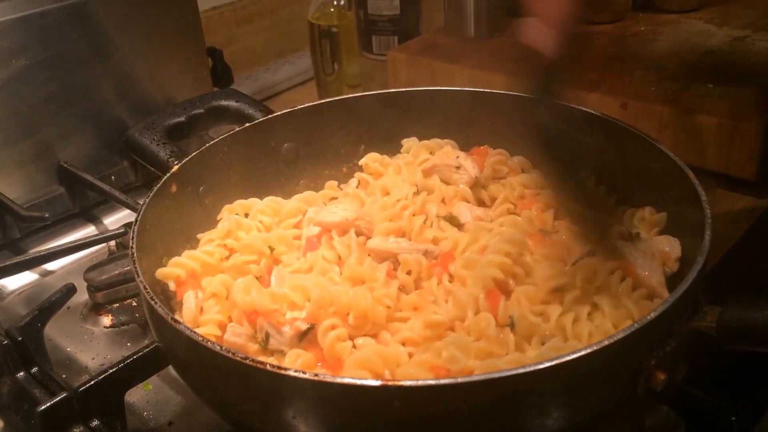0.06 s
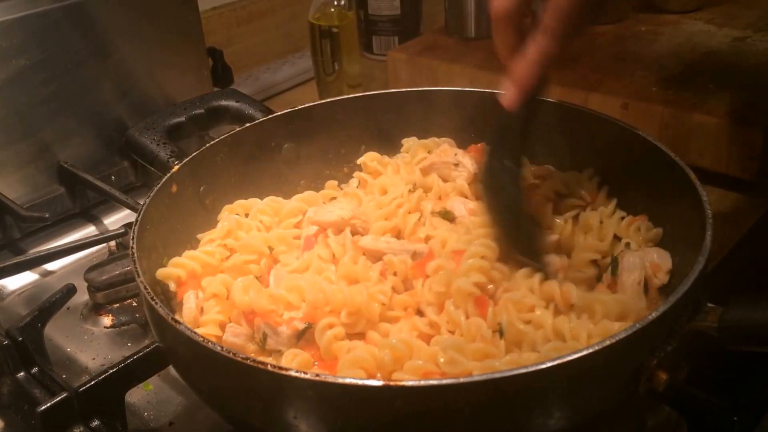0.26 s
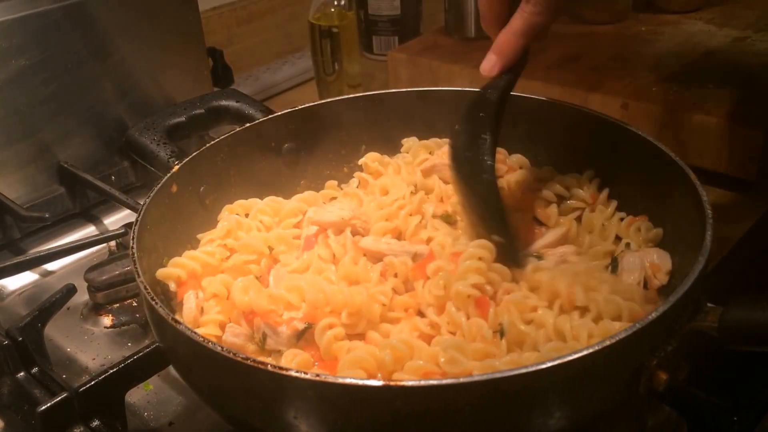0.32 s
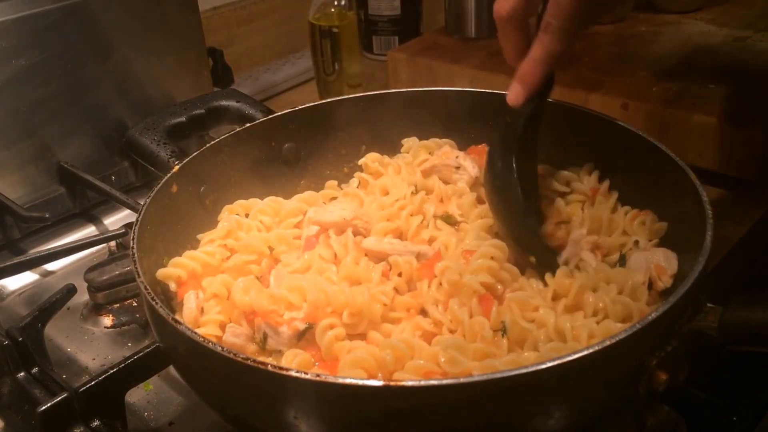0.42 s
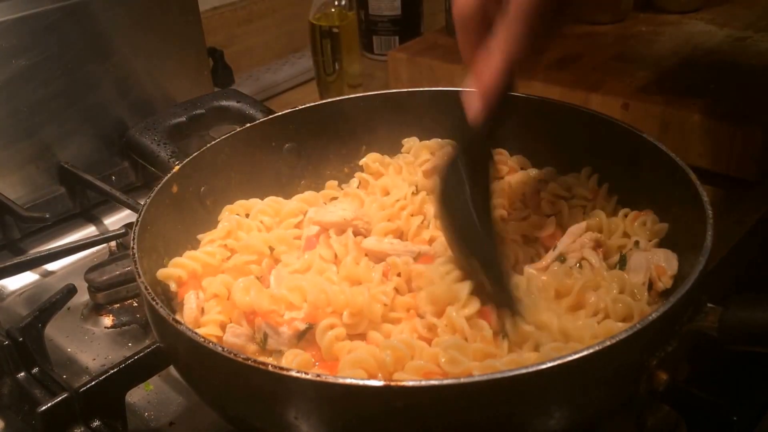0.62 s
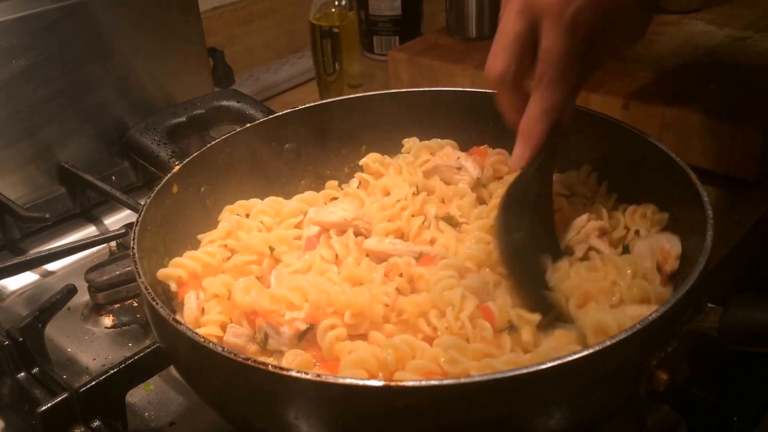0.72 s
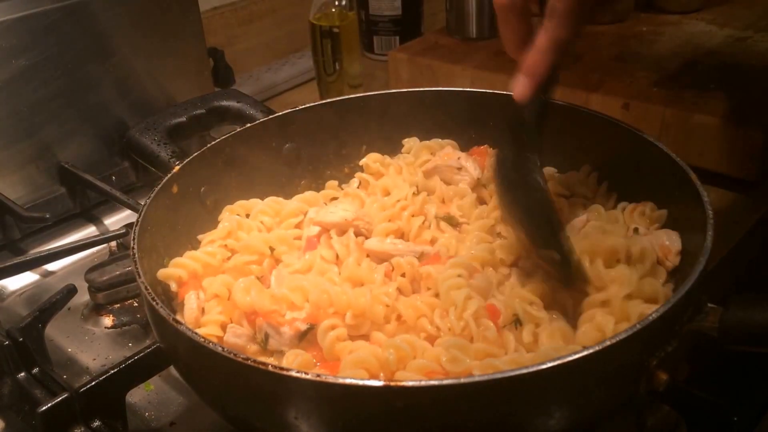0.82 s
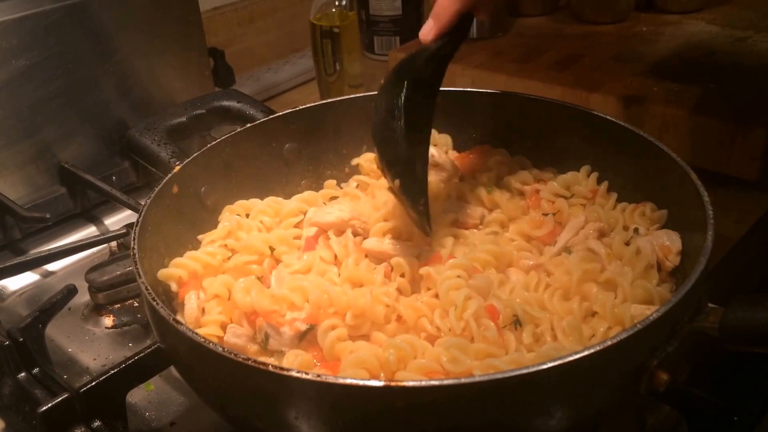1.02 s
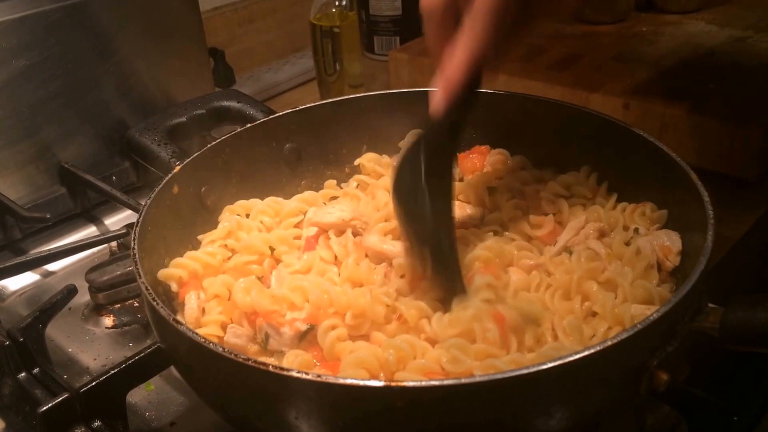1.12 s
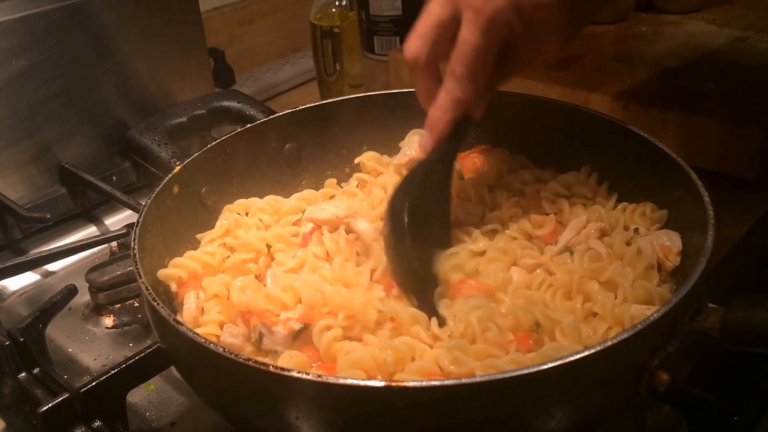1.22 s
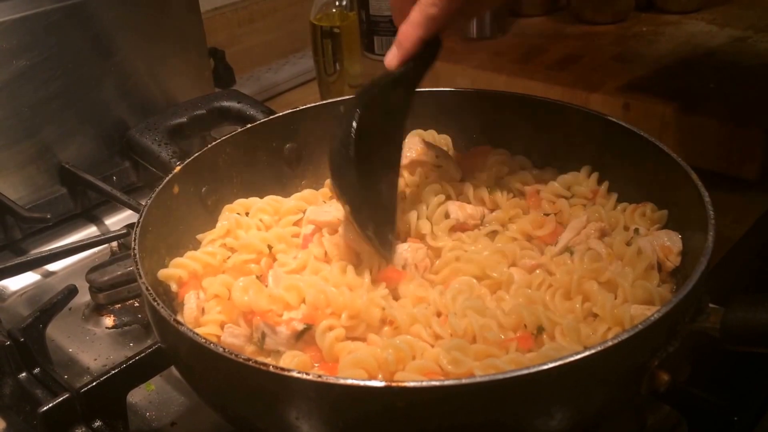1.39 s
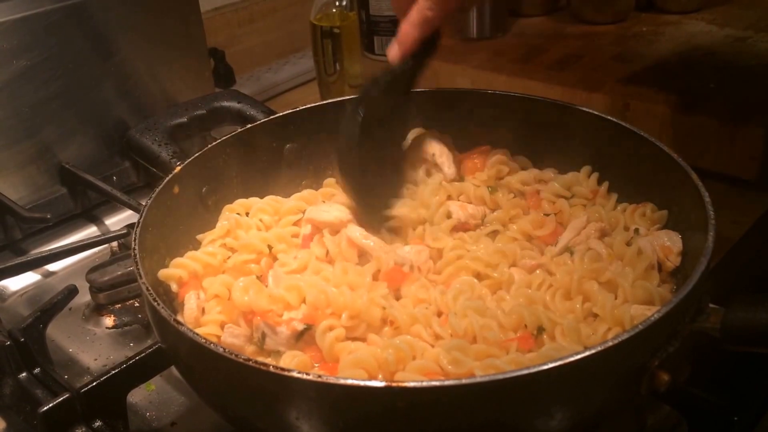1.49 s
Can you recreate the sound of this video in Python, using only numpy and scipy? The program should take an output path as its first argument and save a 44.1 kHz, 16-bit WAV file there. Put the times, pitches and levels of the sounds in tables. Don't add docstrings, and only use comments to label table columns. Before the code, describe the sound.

A spoon stirs wet, saucy pasta in a frying pan, knocking it hard once, fan droning

```python
import sys
import numpy as np
from scipy import signal
from scipy.fft import rfft, irfft, next_fast_len
from scipy.io import wavfile
from scipy.ndimage import map_coordinates

SR = 44100
rng = np.random.default_rng(int(sys.argv[2]) if len(sys.argv) > 2 else 0)


def dump(signal):
    limited = np.clip(np.atleast_2d(signal).T, -1, 1)
    pcm = np.round(limited * 32767).astype(np.int16)
    wavfile.write(sys.argv[1], SR, pcm)


def linear_from_db(decibels):
    return 10 ** (np.asarray(decibels, float) / 20)


N = 68355


def unit(x):
    return x / np.sqrt(np.mean(x ** 2) + 1e-20)


def along(points, hz):
    f, v = np.transpose(points)
    return np.interp(np.log(hz + 1), np.log(f + 1), v)


def wobble(rate):
    knots = rng.standard_normal(int(N * rate / SR) + 4)
    return map_coordinates(knots, [np.arange(N) * rate / SR])


def filtered(x, response):
    m = next_fast_len(len(x) + SR // 2)
    return irfft(rfft(x, m) * response(np.fft.rfftfreq(m, 1 / SR)), m)[:len(x)]


def coloured_noise(count, response):
    return unit(filtered(rng.standard_normal(count), response))


def resonances(peaks):
    def response(f):
        total = 0
        for k, (hz, width, db) in enumerate(peaks):
            damping = 1j * f * width
            total = total + (-1) ** k * linear_from_db(db) * damping / (hz * hz - f * f + damping + 1e-9)
        return total
    return response


def high_pass(f, corner_hz):
    return (1j * f / corner_hz / (1 + 1j * f / corner_hz)) ** 2


def add(track, s, sound):
    part = track[max(round(s * SR), 0):][:len(sound)]
    part += sound[:len(part)]


# frequency in Hz, 60 dB decay time in seconds.
KITCHEN = [(200, 0.69), (1400, .25), (4000, 0.16), (10000, .12)]


def kitchen(x, wet_db):
    hz, t, z = signal.stft(rng.standard_normal(SR // 2), SR, nperseg=256)
    decay = linear_from_db(-60 * t / along(KITCHEN, hz)[:, None])
    tail = signal.istft(z * decay, SR, nperseg=256)[1]
    delayed = np.pad(x, (180, 0))
    out = linear_from_db(wet_db) * signal.fftconvolve(delayed, tail / np.linalg.norm(tail))
    out[:len(x)] += x
    return out


# frequency in Hz, width in Hz, level in dB.
DRONE = [(55.6, 19, -23.5), (113, 11, -6), (117.8, 5.5, -10.5), (200.6, 35.5, 0.5), (244, 20, -6),
         (290, 30, -20), (409.2, 2.9, -1.5), (463.5, 20, -7.5)]
# frequency in Hz, level in dB.
RUMBLE = [(20, -22.5), (50, 8), (300, 0), (500, -7.5)]
# frequency in Hz, level in dB.
AIR = [(290, -31), (500, -2), (801, -4), (1810, -8), (1970, -19), (2620, -13), (15200, -26)]


def fan():
    drone_db, air_db, motor_db, motor_hz = -53, -62, -68, 412
    modes = resonances(DRONE)
    drone = coloured_noise(N, lambda f: modes(f) / (1 + (f / 600) ** 4))
    air = coloured_noise(N, lambda f: linear_from_db(along(RUMBLE + AIR[1:], f)))
    motor = linear_from_db(motor_db) * np.sin(2 * np.pi * motor_hz * np.arange(N) / SR)
    drone = linear_from_db(drone_db + 1.1 * wobble(11.85)) * drone
    return motor + drone + linear_from_db(air_db + 0.31 * wobble(62)) * air


# start in seconds, length in seconds, level in dB, pitch in Hz.
WHISTLE = [
    (1.385, .14, -68, 1830),
    (.318, .035, -66, 6550),
    (.318, .035, -65, 3200),
    (1.1, .15, -77, 4150),
    (.64, .13, -67, 1470),
    (.62, .15, -74, 4100),
    (.63, .14, -73, 2640),
    (.9, .11, -74, 4150),
]


def whistle(width_hz=90, broken_db=4):
    out = np.zeros(N)
    for s, length, db, hz in WHISTLE:
        u = np.linspace(0, 1, round(length * SR))
        level = linear_from_db(db + broken_db * wobble(39.5)[:len(u)])
        swell = np.abs(np.sin(np.pi * u)) ** .5
        add(out, s, level * swell * coloured_noise(len(u), resonances([(hz, width_hz, 0)])))
    return out


# time in seconds, level in dB.
SCRAPE = [(0, -71), (.06, -108), (.2, -67.5), (.4, -60), (.55, -68), (0.698, -61), (.77, -59.5),
          (0.901, -63.5), (1.001, -59.5), (1.1, -68.5), (1.2, -74), (1.36, -71.5), (1.42, -70.5),
          (1.55, -72)]
# frequency in Hz, width in Hz, level in dB.
RUBBED = [(1436, 84.7, 5), (2020, 120, -4.5), (2018, 46, -7), (2352, 72, -12.5), (2670, 63, -2)]


def scrape():
    s, db = np.transpose(SCRAPE)
    rub = rng.standard_normal(N) * linear_from_db(1.0 * wobble(71))
    modes = resonances(RUBBED + [(2010, 490, -5.5)])
    rub = filtered(rub, lambda f: modes(f) * f ** 2 / (f ** 2 + 900 ** 2))
    pressure_db = np.interp(np.arange(N) / SR, s, db) + 0.77 * wobble(27)
    return linear_from_db(pressure_db) * unit(rub)


# start in seconds, length in seconds, level in dB, centre frequency in Hz.
SQUELCH = [(0, 0.058, -58, 3030), (0.102, 0.024, -63.5, 3550), (0.231, 0.074, -47, 3830),
           (0.275, 0.074, -55.5, 4960), (0.338, 0.0066, -53, 4020), (0.408, 0.0099, -64, 3030),
           (.49, 0.0048, -51, 2870), (.524, 0.065, -61.5, 5270), (.58, 0.019, -59.5, 5240),
           (0.779, 0.015, -49, 6060), (0.7864, 0.02, -44, 6200), (0.798, 0.04, -57.5, 4900),
           (.86, 0.082, -64, 4040), (0.952, 0.071, -63, 2360), (0.983, 0.13, -63, 5560),
           (1.061, 0.019, -57, 6540), (1.261, 0.072, -56, 3516), (1.286, 0.053, -55, 7120),
           (1.48, 0.0192, -70.5, 4480)]


def squelch(rate=3500, spread=.45, cycles=6.0, scatter_db=3, hiss=0.93, skew=0.16):
    out, t = np.zeros(N), np.arange(256) / SR
    for s, length, db, centre_hz in SQUELCH:
        draw = rng.random((400, 3))
        u = np.arange(round(length * SR) + 256) / (length * SR)
        when = draw[:, 0] * 400 / rate
        live = when < length
        hz = centre_hz * np.exp(spread * 3.65 * (draw[live, 1:2] - .5))
        hz = np.clip(hz, 500, 15000)
        size = linear_from_db(-scatter_db * np.log(draw[live, 2:] + 1e-6))
        fade = np.exp(-3 * t * hz / cycles) * (1 - np.exp(-t * hz))
        grains = size * np.sin(2 * np.pi * hz * t) * fade
        at = (when[live, None] * SR).astype(int) + np.arange(256)
        cloud = unit(np.bincount(at.ravel(), grains.ravel(), len(u))[:len(u)])
        band = resonances([(centre_hz, 1.6 * centre_hz, 0)])
        wet = coloured_noise(len(u), lambda f: band(f) ** 2)
        swell = np.abs(np.sin(np.pi * np.clip(u, 0, 1) ** skew))
        add(out, s, linear_from_db(db) * kitchen((cloud + hiss * wet) * swell, wet_db=1.5))
    return out


def pops(rows, cycles, narrow, tone):
    out, t = np.zeros(N), np.arange(1024) / SR
    attack = 1 - np.exp(-t / .00025)
    for s, db, hz in rows:
        cavity = resonances([(hz, hz / narrow, 0)])
        band = coloured_noise(len(t), lambda f: cavity(f) ** 2)
        decay = linear_from_db(-60 * t * hz / cycles)
        pop = (band + tone * np.sin(2 * np.pi * hz * t)) * decay * attack
        add(out, s, linear_from_db(db) * kitchen(pop / np.abs(pop).max(), wet_db=-8))
    return out


# time in seconds, peak level in dB, pitch in Hz.
TICKS = [(.0048, -40.5, 5400), (.0105, -45, 9950), (.008, -41, 1670), (.0235, -59, 2310),
         (.0316, -44, 2700), (.05, -47.5, 6840), (.073, -47, 10000), (.092, -46, 6300), (.112, -58, 5040),
         (.1205, -46.5, 7300), (.131, -55, 9050), (.1555, -45, 9180), (.5855, -45, 10200),
         (.6425, -47, 9700), (.851, -43.5, 7500), (.971, -44.5, 10000), (1.0145, -47, 10000),
         (1.0265, -43, 5300), (1.0375, -45, 10860), (1.0427, -40.5, 10000), (1.157, -49, 12150),
         (1.2628, -46, 2840), (1.271, -39.5, 6760), (1.2778, -38, 10500), (1.2942, -39, 5610),
         (1.309, -52.5, 7200), (1.3243, -36.5, 12040), (1.383, -45, 5060), (1.484, -51, 7943),
         (1.496, -49, 3495), (.389, -54, 11870), (.4275, -46.5, 11500), (.4095, -56.5, 10950),
         (.457, -55, 12000), (.5172, -53, 13000), (.5215, -46, 11500), (.4927, -38, 10700),
         (.8595, -43.5, 5030), (1.1103, -49.5, 7500), (.896, -49, 7200), (.9395, -51.5, 10200),
         (.954, -45.5, 5500), (1.0705, -45, 13090), (1.139, -45.5, 13000), (1.2477, -47, 10960),
         (1.289, -46, 8475), (1.355, -51, 6000), (1.4255, -53, 4010), (1.4418, -45, 10900),
         (1.4965, -50.5, 6500)]


def ticks():
    return pops(TICKS, cycles=26, narrow=1.4, tone=0.22)


# time in seconds, peak level in dB, pitch in Hz.
SMACKS = [(.352, -41, 6170), (.409, -48, 4000), (.416, -49, 3070), (.4892, -30, 1610), (.4925, -24.5, 5560),
          (.4926, -29.5, 2900), (.5168, -29.5, 5900), (.5212, -42.5, 3160), (.5852, -46, 4522),
          (.5995, -50, 7800), (.7142, -42.5, 7350), (.762, -48, 5780), (.7808, -37, 7060),
          (.788, -28.5, 4240), (.7887, -26.5, 6250), (.7912, -33.5, 8500), (.7955, -32.5, 6450),
          (.7997, -31.5, 6140), (.8, -40, 2020), (.8055, -38, 2070), (.8177, -42, 7440), (.3522, -44, 3730),
          (.9542, -38, 2013), (1.0648, -38.5, 6687), (1.0703, -45, 6300), (1.1103, -44, 5100),
          (1.2667, -37.5, 3250), (1.2669, -42, 5740), (1.3032, -44, 12800), (1.2925, -44, 5500),
          (1.2915, -43.5, 3703), (1.3037, -37.5, 6700), (1.324, -40.5, 6500), (.2885, -37.5, 6300),
          (.2955, -38, 6470), (.4893, -41, 5870), (.4936, -26, 5620), (.4975, -33.5, 5405),
          (.523, -36, 3570), (.7815, -44, 4270), (.7905, -44, 5040), (.8085, -55, 6100), (.957, -44, 2240),
          (1.0115, -61, 2500), (1.0245, -48, 7000), (1.029, -45, 4885), (1.0745, -42.5, 6450),
          (1.279, -47.5, 2900), (1.298, -45, 3190), (1.309, -44, 884), (1.334, -45.5, 3120),
          (1.485, -51.5, 4000)]


def smacks():
    return pops(SMACKS, cycles=42, narrow=2.78, tone=1.3)


# time in seconds, peak level in dB.
KNOCK = [
    (.2343, -6),
]
# frequency in Hz, level in dB, 60 dB decay time in seconds.
PAN = [(423, -14.5, 0.25), (496.4, -13, 0.37), (636, -12.5, 0.37), (713.6, -6.5, 0.17), (862, -11, 0.088),
       (913, -7, 0.11), (1056.4, -6.5, 0.22), (1140, -7.5, 0.13), (1402, -8, 0.24), (1535, -7.5, 0.25),
       (1655, -2.5, 0.149), (1877, -8, 0.17), (2087, -11, 0.047), (3160, -17, 0.09)]
# frequency in Hz, level in dB.
BODY = [(180, -15), (450, -3.5), (700, -3), (1100, -2.5), (1550, 1.5), (2050, -2.5), (2500, -24),
        (4000, -43.5)]
# frequency in Hz, level in dB.
CRACK = [(1500, -21), (2500, -4.5), (3150, 3.5), (4850, -7.5), (6530, -3.5), (8200, -11.5), (10000, -11.5),
         (15000, -43)]


def knock():
    out, t = np.zeros(N), np.arange(SR // 2) / SR
    lead_s, lead_db = 0.0092, -36
    blow_hz, blow_hold_s, blow_t60 = 1522.4, 0.0062, 0.016
    for s, db in KNOCK:
        snap = -linear_from_db(1.5) * np.exp(-((t - .0005) / 0.00013) ** 2)
        blow = linear_from_db(-4 - 60 * np.maximum(t - blow_hold_s, 0) / blow_t60) * np.sin(2 * np.pi * blow_hz * t)
        blow = (1 - np.exp(-t / .00025)) * blow
        crack = coloured_noise(len(t), lambda f: linear_from_db(along(CRACK, f))) * linear_from_db(-12.5 - 60 * t / 0.017)
        ring = np.zeros(len(t))
        for hz, level, t60 in PAN:
            envelope = linear_from_db(level - 60 * t / t60 + 3.8 * wobble(74)[:len(t)])
            ring += envelope * np.sin(2 * np.pi * hz * t + rng.uniform(0, 4.4))
        ring = linear_from_db(-10.5) * (1 - np.exp(-t / 0.00082)) * ring
        body = coloured_noise(len(t), lambda f: linear_from_db(along(BODY, f)))
        body = body * linear_from_db(-12 - 60 * t / .23) * (1 - np.exp(-t / 0.0028))
        add(out, s, linear_from_db(db) * kitchen(blow + snap + crack, wet_db=-9))
        add(out, s, linear_from_db(db) * (body + ring))
        rubbed = resonances([(2100, 700, 0), (1200, 900, -3)])
        brush = coloured_noise(len(t), lambda f: rubbed(f) ** 2)
        add(out, s - lead_s, linear_from_db(db + lead_db) * brush * (t < lead_s) * (t / lead_s) ** 0.35)
    return filtered(out, lambda f: high_pass(f, 392) / np.sqrt(1 + (f / 10000) ** 6))


def scene():
    wet = squelch() + ticks() + smacks()
    wet = filtered(wet, lambda f: high_pass(f, 1300) / (1 + 1j * f / 13000) ** 2)
    return (fan() + whistle() + scrape() + wet + knock())[None]


# centre in seconds, frequency in Hz above which sound is lost.
DROPOUTS = [
    (0.334, 4150),
    (.548, 7550),
    (.994, 8100),
    (1.209, 4625),
]


def treble_dropouts(x):
    for s, hz in DROPOUTS:
        u = np.clip((np.arange(N) / SR - s) / (2048 / SR), -.5, .5)
        dip = .93 * (1 - np.abs(np.sin(np.pi * u)))
        x = x - dip * filtered(x, lambda f: f > hz)
    return x


def low_pass(x):
    return signal.sosfilt(signal.butter(12, 16480, fs=SR, output="sos"), x)


def record(dry):
    x = filtered(dry[0], lambda f: np.where(f < 15300, 1, linear_from_db(-25)))
    x = treble_dropouts(x)
    return low_pass(x[None])


dry = scene()
out = record(dry)
dump(out)
```